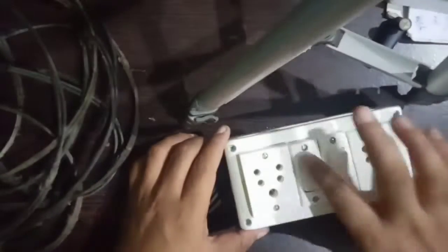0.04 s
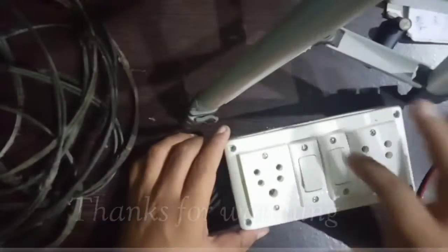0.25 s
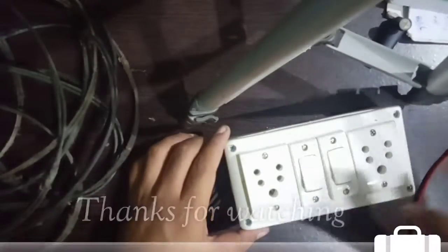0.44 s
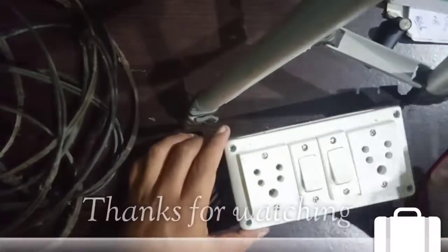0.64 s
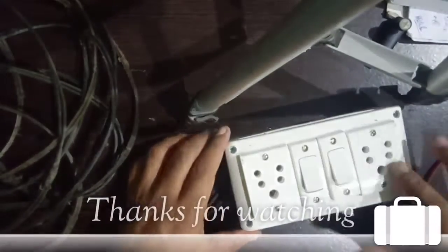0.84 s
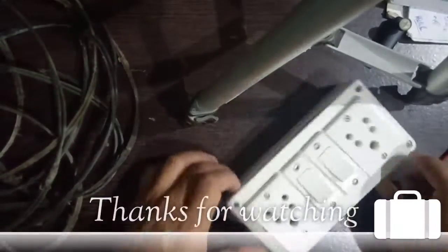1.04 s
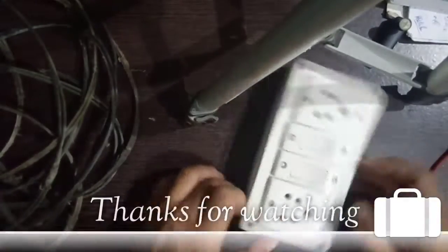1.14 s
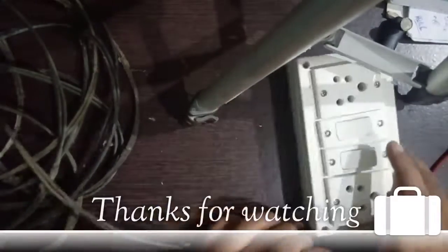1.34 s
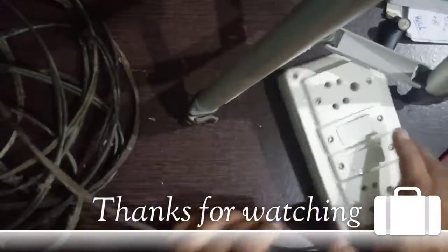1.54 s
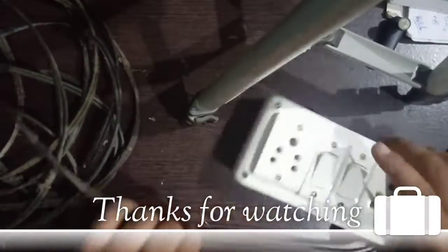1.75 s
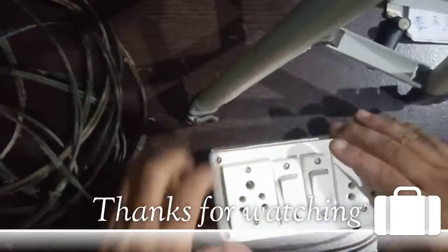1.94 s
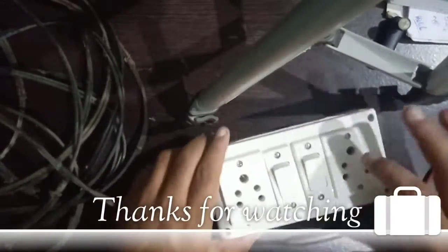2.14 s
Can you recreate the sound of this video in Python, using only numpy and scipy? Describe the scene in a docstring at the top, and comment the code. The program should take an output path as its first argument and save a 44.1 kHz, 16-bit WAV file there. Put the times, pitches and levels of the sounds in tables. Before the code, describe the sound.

Close, hard plastic switch snaps come twice in quick succession, followed by a pause, a soft bump, and short scrapes and ticks of the box turned on a wooden surface, over continuous shrill crickets and faint low room rumble.

```python
"""Crickets trill throughout as blurred, pulsed tones, under a bush cricket of pulsed noise, over room rumble.
Early on, two rocker switches snap close to the microphone: impulses and rattle with damped box modes.
From about 0.9 s the plastic box is handled on wood: slip noise, grit, ticks, bumps and juddering tones.
From 1.555 s to 1.94 s a lower cricket adds one phrase.
A look-ahead limiter ducks the background just before each snap."""
import sys
import numpy as np
from scipy import signal
from scipy.io import wavfile
from scipy.ndimage import uniform_filter1d, minimum_filter1d

SR = 44100
rng = np.random.default_rng(int(sys.argv[2]) if len(sys.argv) > 2 else 0)


def wav_out(sig):
    """Save sig, one row per channel (or a flat mono array), as 16-bit PCM at SR to the path in sys.argv[1]."""
    wavfile.write(sys.argv[1], SR, np.round(np.clip(np.atleast_2d(sig).T, -1, 1) * 32767).astype(np.int16))


N = 97020
TIME = np.arange(N) / SR


def amp(db):
    """Level to amplitude: 20 dB is a factor of ten."""
    return 10 ** (np.asarray(db) / 20)


def unit(x):
    """Power normalisation: scales to rms 1."""
    return x / np.sqrt(np.mean(x ** 2) + 1e-20)


def unit_energy(x):
    """Energy normalisation: scales the sum of squares to 1."""
    return x / np.linalg.norm(x)


def decay(t, t60):
    """Exponential damping: the level falls 60 dB in t60 seconds."""
    return np.exp(-np.log(1000) * t / t60)


def at_hz(points, hz):
    """Logarithmic frequency scale: interpolates a spectrum along it."""
    f, value = np.transpose(points)
    return np.interp(np.log(hz + 1), np.log(f), value)


def curve(points):
    """Linear interpolation: reads a control curve at every sample."""
    return np.interp(TIME, *np.transpose(points))


def add(mix, s, sound):
    """Superposition: sums a sound into the mix from time s."""
    part = mix[max(round(s * SR), 0):][:len(sound)]
    part += sound[:len(part)]


def high_pass(x, hz, order=2):
    """Butterworth high-pass: attenuates what lies below hz."""
    return signal.sosfilt(signal.butter(order, hz, "high", fs=SR, output="sos"), x)


def colour(x, points, size=2048):
    """Minimum-phase filtering: a causal, unit-energy response with the given spectral shape."""
    log_gain = np.log(amp(at_hz(points, abs(np.fft.fftfreq(size, 1 / SR)))))
    # the Hilbert transform of the log gain supplies the phase
    spectrum = np.exp(np.conj(signal.hilbert(log_gain)))
    taps = np.fft.ifft(spectrum).real[:size // 2]
    return signal.fftconvolve(x, unit_energy(taps))[:len(x)]


def wander(width_hz):
    """Narrow-band noise: a complex random envelope of rms 1 centred on 0 Hz."""
    noise = rng.standard_normal(N) + 1j * rng.standard_normal(N)
    band = 1 / (1 + (2 * np.fft.fftfreq(N, 1 / SR) / width_hz) ** 4) ** .5
    z = np.fft.ifft(noise * band)
    return z / np.std(z)


def fuzzy_tone(hz, width_hz):
    """Multipath blurring: a random envelope modulates a carrier, rms 1."""
    carrier = np.exp(2j * np.pi * np.cumsum(hz * np.ones(N)) / SR)
    return unit((wander(width_hz) * carrier).real)


def grains(per_s, spread_db):
    """Random point process: tiny impacts of uneven size and either sign, rms 1."""
    size = amp(spread_db * np.minimum(rng.exponential(1, N), 4))
    sign = rng.choice([-1, 1], N)
    struck = rng.random(N) < per_s / SR
    return unit(size * sign * struck)


# reverberation time: (frequency [Hz], T60 [s])
ROOM_T60 = [(200, 0.44), (1000, 0.27), (2000, 0.11), (3500, 0.19), (7000, 0.15), (15000, 0.25)]
ROOM_DELAY_S = 0.0014


def room(x, size=256):
    """Diffuse reverberation: noise with a separate exponential decay in each frequency band."""
    hz, t, z = signal.stft(rng.standard_normal(SR // 2), SR, nperseg=size)
    fade = decay(t, at_hz(ROOM_T60, hz)[:, None])
    tail = signal.istft(z * fade, SR, nperseg=size)[1]
    tail[:round(ROOM_DELAY_S * SR)] = 0
    return signal.fftconvolve(x, unit_energy(tail))[:N]


# background noise spectrum: (frequency [Hz], level [dB])
AIR_COLOUR = [(25, -10), (60, -22), (110, 3), (170, -1.5), (240, 0.5), (350, -12), (560, -8.5), (900, -17),
              (1300, -17), (2200, -19), (3500, -22), (4600, -30), (6000, -32), (8100, -26.5), (9500, -39.5),
              (15500, -41.5)]
# slow gain of noise and hum: (time [s], level [dB])
AIR_LEVEL = [(0, -2.5), (.5, -1), (2.2, -1)]
AIR_DB, AIR_PATCH_DB = -50, 1  # noise before the slow gain; rms of its level drift
HUM_HZ, HUM_WIDTH_HZ, HUM_DB = 170, 19, -58.5  # hum level before the slow gain


def air(size=1024):
    """Stationary noise with local level drift, plus a narrow-band hum that beats irregularly."""
    hz, t, z = signal.stft(rng.standard_normal(N), SR, nperseg=size)
    # smooth over frequency, then over time
    patches = uniform_filter1d(rng.standard_normal(z.shape), size=10, axis=0)
    patches = unit(uniform_filter1d(patches, size=6, axis=1))
    gain = amp(at_hz(AIR_COLOUR, hz)[:, None] + AIR_PATCH_DB * patches)
    wash = signal.istft(z * gain, SR, nperseg=size)[1][:N]
    hum = amp(HUM_DB) * fuzzy_tone(HUM_HZ, HUM_WIDTH_HZ)
    return amp(curve(AIR_LEVEL)) * (amp(AIR_DB) * unit(wash) + hum)


# stroke rate of the bush cricket: (time [s], rate [strokes/s])
RASP_RATE = [(0, 10.5), (1.1, 10.5), (1.65, 9.5), (2.2, 10.4)]
# rasp spectrum: (frequency [Hz], level [dB])
RASP_COLOUR = [(7000, -40), (9500, -6), (12000, 3), (14500, -7), (16000, 3)]
RASP_FIRST_S, RASP_DB = .043, -67.5  # centre of the first stroke; level at a stroke's centre


def bush_cricket():
    """Amplitude modulation: very high noise swells about ten times a second, one swell a stroke."""
    turns = np.cumsum(curve(RASP_RATE)) / SR - RASP_FIRST_S * RASP_RATE[0][1]
    swell = np.cos(np.pi * turns) ** 2
    return amp(RASP_DB) * swell * colour(rng.standard_normal(N), RASP_COLOUR)


CHIRP_FROM_S, CHIRP_TO_S, CHIRP_RISE_S, CHIRP_FALL_S = 1.555, 1.94, 0.065, 0.045
CHIRP_HZ, CHIRP_WIDTH_HZ, CHIRP_DB = 5030, 230, -65
CHIRP_PULSES_PER_S, CHIRP_DEPTH = 30, 0.33  # modulation depth 0-1


def low_cricket():
    """Amplitude modulation: a blurred lower tone pulses through one short phrase."""
    rise = (TIME - CHIRP_FROM_S) / CHIRP_RISE_S
    fall = (CHIRP_TO_S - TIME) / CHIRP_FALL_S
    gate = np.clip(np.minimum(rise, fall), 0, 1)
    pulses = 1 + CHIRP_DEPTH * np.cos(2 * np.pi * CHIRP_PULSES_PER_S * (TIME - CHIRP_FROM_S))
    return amp(CHIRP_DB) * gate * pulses * fuzzy_tone(CHIRP_HZ, CHIRP_WIDTH_HZ)


# trilling voices at one stroke rate: (pitch [Hz], width [Hz], level before the trill gain [dB],
# lag [strokes], modulation depth [0-1], pitch fall per stroke [Hz])
CRICKETS = [(7475, 325, -56.5, -0.051, 0.6, -150), (7623, 240, -61, 0.21, 0.54, 76),
            (7084, 340, -59.5, 0.21, 0.67, 131), (6780, 420, -64, -0.34, 0.24, 157)]
# gain shared by the trills: (time [s], level [dB])
TRILL = [(0, -5), (.35, -1.5), (.55, 0.5), (.75, 1), (1.3, -1), (1.48, 1), (2.2, -0.5)]
STROKES_PER_S, STROKE_S = 20.02, .034  # the second is the centre of a stroke with no lag


def crickets():
    """Amplitude and frequency modulation: each wing stroke is a swell of a gliding, blurred tone."""
    out = np.zeros(N)
    for hz, width, db, lag, depth, fall_hz in CRICKETS:
        turns = (TIME - STROKE_S) * STROKES_PER_S - lag
        swell = unit(1 + np.clip(depth, 0, 1) * np.cos(2 * np.pi * turns))
        glide_hz = hz - fall_hz * (turns - np.round(turns))
        out += amp(db) * swell * fuzzy_tone(glide_hz, width)
    return out * amp(curve(TRILL))


# sliding effort: (time [s], level relative to SLIDE_DB [dB])
SLIDE = [(1.04, -21.5), (1.13, -8), (1.19, -13), (1.225, -10.5), (1.25, -4), (1.31, -10), (1.37, -19),
         (1.62, -27), (1.665, -4.5), (1.695, -12), (1.73, -2.5), (1.80, -6), (1.86, -16.5), (1.895, -0.5),
         (1.94, -26), (2.0, -31)]
# sliding spectrum: (frequency [Hz], level [dB])
SLIDE_COLOUR = [(100, -7), (300, -2.5), (520, 0), (760, 2.5), (980, -2.5), (1250, -10.5), (3200, -17.5),
                (4800, -20), (15500, -30)]
SLIDE_DB, SLIPS_PER_S = -46, 1800
SLIP_SPREAD_DB = 4  # mean excess of the exponential size spread, before its cap; slips and grit
# grit under the box: (time [s], level [dB])
GRIT = [(1.225, -76), (1.25, -55.5), (1.31, -61.5), (1.37, -72), (1.70, -86), (1.715, -54), (1.76, -67.5),
        (1.80, -66), (1.85, -74), (1.895, -65), (1.96, -74)]
# grit spectrum: (frequency [Hz], level [dB])
GRIT_COLOUR = [(500, -18), (1500, 3), (3000, 3.5), (4800, -11), (9000, -8.5), (15500, -27)]
GRITS_PER_S = 800


def sliding():
    """Stick-slip friction: dense tiny slips and sparser grit impacts follow the sliding effort."""
    slips = colour(grains(SLIPS_PER_S, SLIP_SPREAD_DB), SLIDE_COLOUR)
    grit = colour(grains(GRITS_PER_S, SLIP_SPREAD_DB), GRIT_COLOUR)
    return amp(SLIDE_DB + curve(SLIDE)) * slips + amp(curve(GRIT)) * grit


# light ticks of the handled box: (time [s], level [dB])
TICKS = [(1.2103, -37), (1.244, -28.5), (1.2625, -35), (1.308, -40), (1.332, -40), (1.4284, -23.5),
         (1.6630, -33)]
# tick spectrum: (frequency [Hz], level [dB])
TICK_COLOUR = [(200, -23), (1000, -11), (1700, -7), (2200, 10), (2700, -9), (3600, 6), (4700, -10),
               (6000, -3), (9000, -15.5), (15500, -20)]
TICK_T60 = 0.0097  # s


def ticks(out):
    """Impact excitation: adds short, exponentially damped noise bursts."""
    t = TIME[:SR // 10]
    for s, db in TICKS:
        burst = rng.standard_normal(len(t)) * decay(t, TICK_T60)
        add(out, s, amp(db) * colour(unit_energy(burst), TICK_COLOUR))


# catches of the sliding box: (time [s], length [s], level [dB], mean pitch [Hz])
JUDDERS = [(1.709, .028, -39.5, 755), (1.884, .03, -41, 430)]
JUDDER_WOBBLE, JUDDER_WOBBLE_HZ = .16, 300  # scale of the random pitch deviation; its noise width
JUDDER_OVERTONE_DB = -17.5


def judders(out):
    """Friction-driven oscillation: adds brief tones of randomly wobbling pitch, with an octave overtone."""
    for s, length, db, hz in JUDDERS:
        arch = signal.windows.tukey(round(length * SR), .7)
        wobble = JUDDER_WOBBLE * wander(JUDDER_WOBBLE_HZ).real[:len(arch)]
        phase = 2 * np.pi * np.cumsum(hz * (1 + wobble)) / SR
        tone = np.sin(phase) + amp(JUDDER_OVERTONE_DB) * np.sin(2 * phase)
        add(out, s, amp(db) * arch * tone)


# soft bumps on the wood: (time [s], level [dB], pitch [Hz])
BUMPS = [(0.9184, -42, 139), (1.235, -39, 170), (1.53, -53, 142), (1.777, -43.5, 161), (1.91, -38.5, 170)]
BUMP_RISE_S = 0.0038


def bumps(out):
    """Damped resonance: adds low tones that rise briefly and die away."""
    t = TIME[:SR // 10]
    for s, db, hz in BUMPS:
        swell = t / BUMP_RISE_S * np.exp(1 - t / BUMP_RISE_S)
        add(out, s, -amp(db) * swell * np.sin(2 * np.pi * hz * t))


HANDLING_ROOM_DB = -7.5


def handling():
    """Superposition of contact sounds: the box slides, ticks, judders and bumps, with reverberation."""
    out = sliding()
    ticks(out)
    judders(out)
    bumps(out)
    return out + amp(HANDLING_ROOM_DB) * room(out)


# switch snaps: (time [s], crack level [dB], rattle level relative to the snap's own click [dB], # rattle fade
# time [s], room level relative to ROOM_DB [dB])
SNAPS = [(.1381, -1, -2.5, 0.0019, 2), (.3063, 4.5, -0.5, 0.0034, -7)]
# crack spectrum: (frequency [Hz], level [dB])
SNAP_COLOUR = [(200, -47), (450, -29), (700, -0.5), (1400, 0), (2000, 5.5), (2650, -1), (3300, -3),
               (4500, -14), (5600, -9.5), (7000, -4), (9500, -25), (15500, -24.5)]
# plastic box modes, before the box high-pass:
# (frequency [Hz], T60 [s], level under first switch [dB], level under second switch [dB])
BOX = [(665, 0.014, -39, -38.5), (896, 0.014, -31, -18), (1017, 0.044, -22, -24), (1390, .016, -25, -27),
       (1900, 0.016, -32.5, -13.5), (2250, 0.026, -24, -42), (2870, 0.0081, -29, -17),
       (3330, 0.015, -31, -23), (4050, 0.0098, -26, -44), (5700, 0.012, -52, -50),
       (7000, 0.0052, -40, -24.5)]
RATTLE_FADE_DB = -8  # over one rattle fade time
SETTLE_S, SETTLE_DB, SETTLE_T60 = .1524, -17, .022  # the first rocker knocks once more as it seats
ROOM_DB, RING_TO_ROOM = -10.5, .25  # ring amplitude sent to the room, relative to the crack
ROOM_TREBLE_DB, ROOM_TREBLE_HZ = -10, 8000  # hard surfaces nearby throw back extra treble
BOX_CUT_HZ = 715  # the small box radiates little below this


def switches():
    """Impulse excitation: each snap is a click with contact rattle and damped box modes, mostly crack in the room."""
    direct, to_room, t = np.zeros(N), np.zeros(N), TIME[:SR // 5]
    for k, (s, db, rattle_db, rattle_s, room_db) in enumerate(SNAPS):
        rattle = rng.standard_normal(len(t)) * amp(RATTLE_FADE_DB * t / rattle_s)
        rattle *= (t > .0005) * (t < 2 * rattle_s)
        click = t == 0
        crack = amp(db) * colour(click + amp(rattle_db) * unit_energy(rattle), SNAP_COLOUR)
        ring = np.zeros(len(t))
        for hz, t60, *levels in BOX:
            ring += amp(levels[k]) * decay(t, t60) * np.sin(2 * np.pi * hz * t)
        add(direct, s, crack + ring)
        add(to_room, s, amp(ROOM_DB + room_db) * (crack + RING_TO_ROOM * ring))
    knock = rng.standard_normal(len(t)) * decay(t, SETTLE_T60)
    add(direct, SETTLE_S, amp(SETTLE_DB) * colour(unit_energy(knock), SNAP_COLOUR))
    treble_tail = room(high_pass(to_room, ROOM_TREBLE_HZ))
    tail = room(to_room) + amp(ROOM_TREBLE_DB) * treble_tail
    return high_pass(direct + tail, BOX_CUT_HZ, order=3)


def scene():
    """Superposition of pressures: all sources sum at one microphone."""
    background = air() + bush_cricket() + low_cricket() + crickets()
    return (background + handling() + switches())[None]


LIMIT_DB, MAX_DUCK_DB, LOOK_AHEAD_S = -31, 7, 0.014  # threshold re full scale; largest reduction
EDGE_HZ = 15700


def record(dry):
    """Look-ahead limiting: gain falls before each peak and recovers promptly; then a low-pass."""
    over_db = 20 * np.log10(abs(dry[0]) + 1e-9) - LIMIT_DB
    gain_db = -np.clip(over_db, 0, MAX_DUCK_DB)
    ahead = round(LOOK_AHEAD_S * SR)
    # the negative origin places the window over the coming samples
    gain_db = minimum_filter1d(gain_db, ahead, origin=-(ahead // 2))
    gain_db = uniform_filter1d(gain_db, size=128)
    low_pass = signal.firwin(301, EDGE_HZ, window=("kaiser", 8), fs=SR)
    return signal.oaconvolve(dry * amp(gain_db), low_pass[None], "same")


dry = scene()
out = record(dry)
wav_out(out)
```